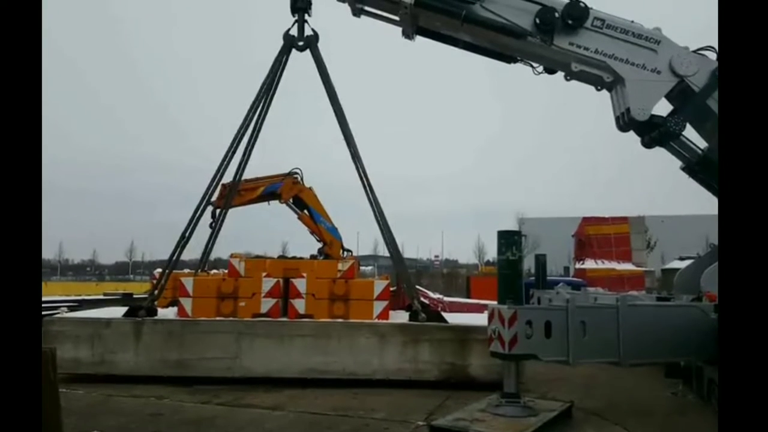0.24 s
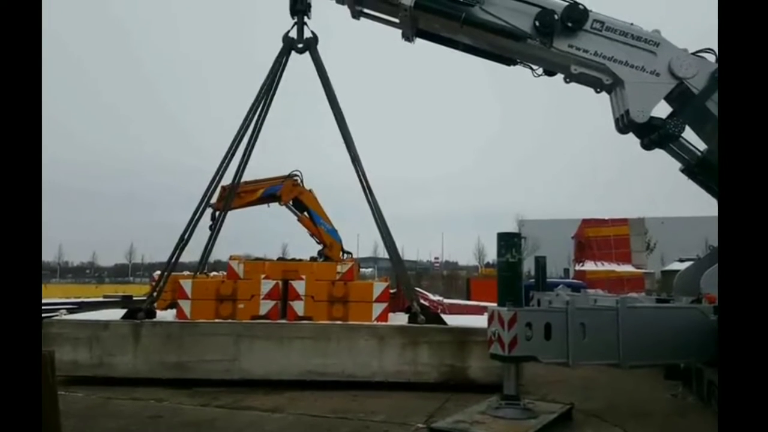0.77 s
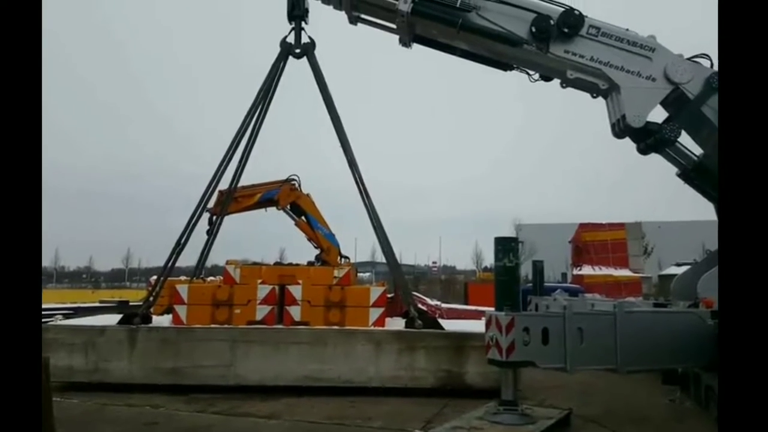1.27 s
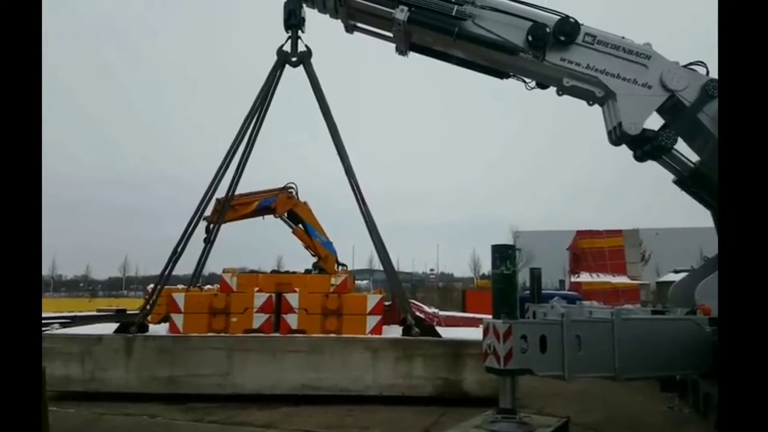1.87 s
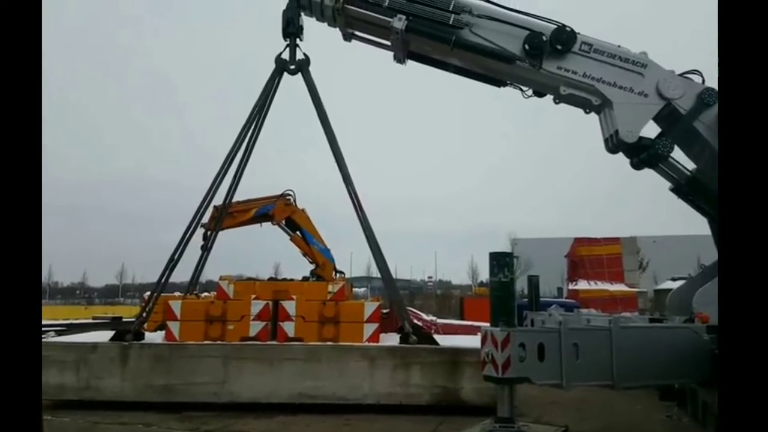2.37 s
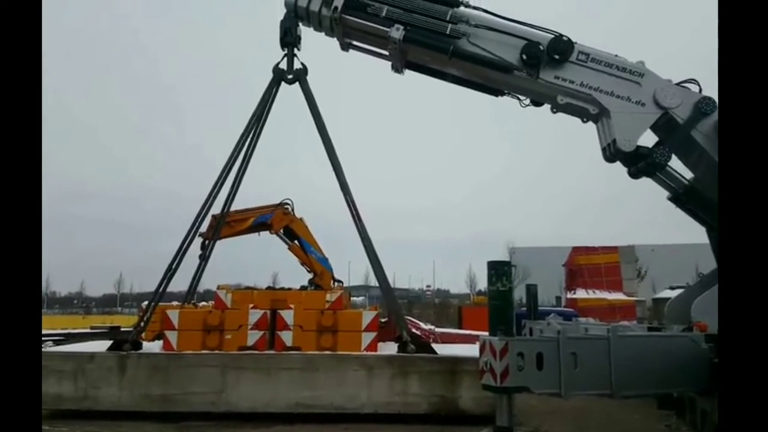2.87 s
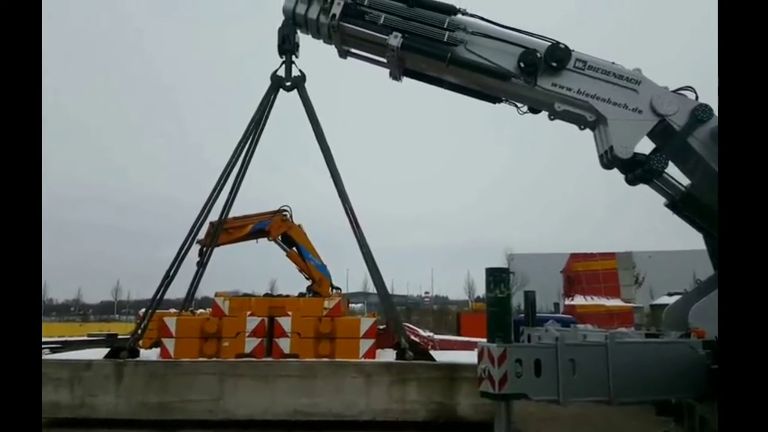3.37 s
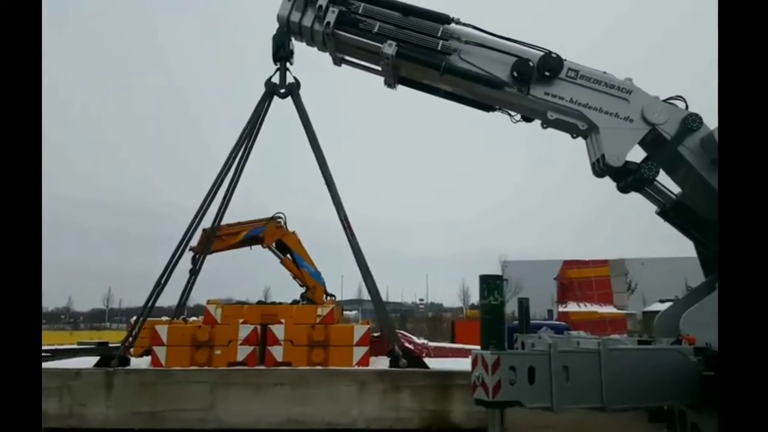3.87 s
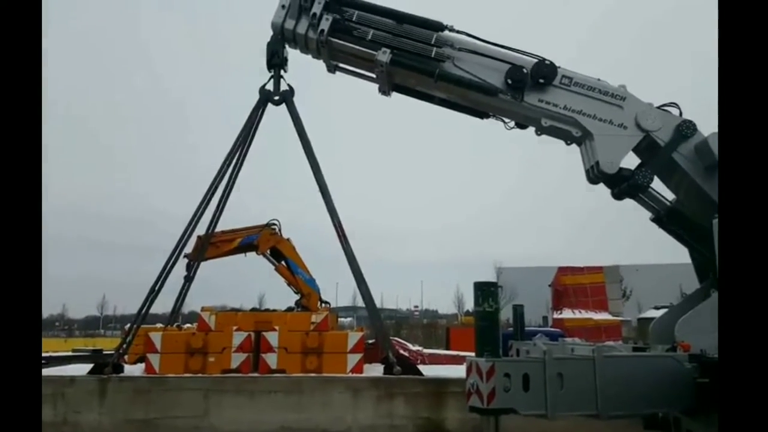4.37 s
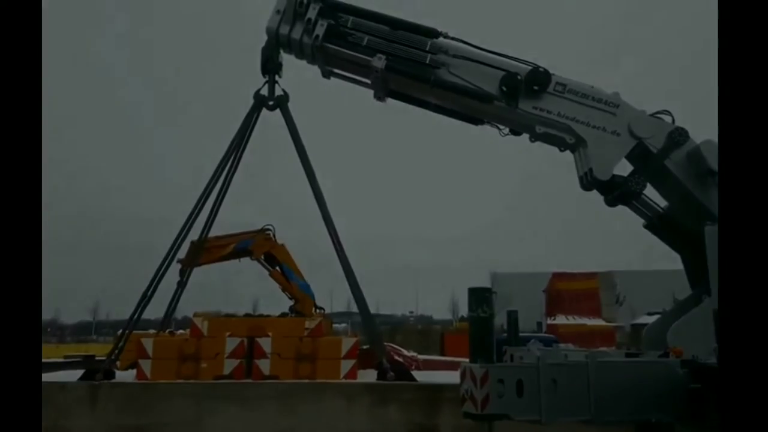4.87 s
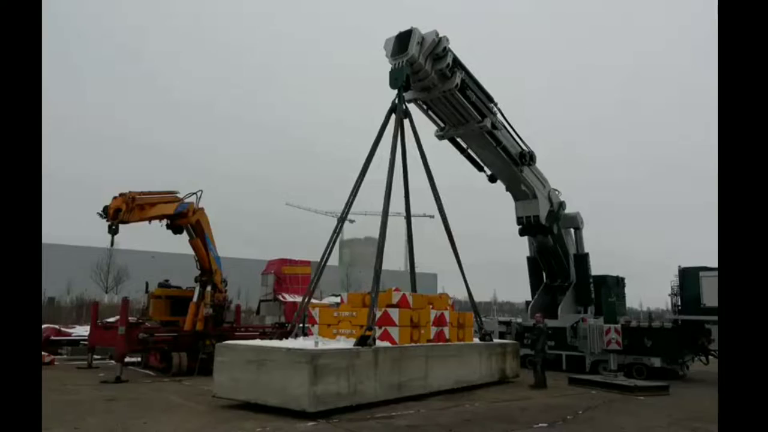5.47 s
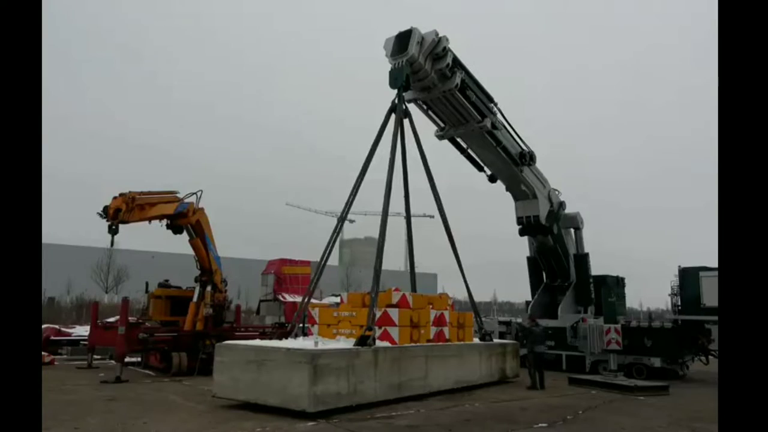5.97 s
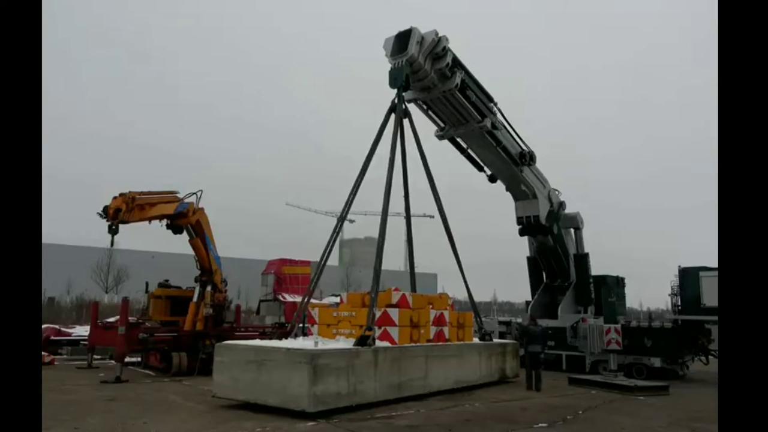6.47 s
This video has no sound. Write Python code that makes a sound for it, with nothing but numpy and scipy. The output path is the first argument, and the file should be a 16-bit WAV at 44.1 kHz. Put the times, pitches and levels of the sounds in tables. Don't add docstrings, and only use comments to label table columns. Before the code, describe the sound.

Loud steady diesel and hydraulic pump whine of a crane up close drops suddenly, fades to silence, then clicks to a distant hum with a piercing valve whistle.

```python
import sys
import numpy as np
from scipy import signal
from scipy.fft import rfft, irfft
from scipy.io import wavfile
from scipy.ndimage import uniform_filter1d

SR = 44100
rng = np.random.default_rng(int(sys.argv[2]) if len(sys.argv) > 2 else 0)


def dump(signal):
    limited = np.clip(np.atleast_2d(signal).T, -1, 1)
    pcm = np.round(limited * 32767).astype(np.int16)
    wavfile.write(sys.argv[1], SR, pcm)


def invert_db(level):
    return 10 ** (np.asarray(level, dtype=float) / 20)


N = 296793
T = np.arange(N) / SR
COARSE = T[::64]
FREQ = np.fft.rfftfreq(N, 1 / SR)

SHAFT_HZ, PUMP_ORDER, MESH_ORDER = 25.997, 14, 78
ROAR_TOP_HZ, NEAR_ROAR_DB, FAR_ROAR_DB, LEFT_ROAR_DB = 15480, -26, -37, -1.2
DUCK_S, SILENT_S, CHANGE_S = 4.118, 5.63, 5.6383

# shaft order, level in
# dB, left minus right in dB, left phase lead in rad.
SHAFT_ORDERS = [(1.5, -59, -3, -0.3), (3.0, -30, -1, -0.1), (4.5, -42, -1, -0.3), (6.0, -34, -1, -0.1),
                (6.5, -41, -1, -0.2), (7.0, -38, -1, -0.2), (7.5, -40, -1, -0.3), (9.0, -48, -2, -0.1),
                (10.0, -40, -2, -0.0), (12.0, -44, 8, -0.1), (14.0, -25, -8, -0.7), (15.0, -49, -3, -0.7),
                (17.0, -51, -3, -0.4), (18.0, -50, -5, -0.6), (19.5, -52, 2, -0.7), (20.0, -47, 1, -1.3),
                (20.5, -45, -1, -1.3), (21.0, -44, -6, -0.4), (21.5, -53, -2, -0.6), (22.0, -45, -3, -0.9),
                (22.5, -47, -1, -0.6), (23.5, -49, -1, -0.6), (26.0, -51, -1, -1.1),
                (28.0, -38, -2, -0.6), (29.0, -46, 1, -1.1), (30.0, -51, -10, -1.7), (35.0, -49, -1, -1.4),
               (36.0, -47, 0, -1.9), (38.0, -48, 2, -1.7), (39.0, -33, 0, -1.9), (40.0, -49, 0, -2.7),
               (41.0, -46, -1, -1.9), (42.0, -48, -1, -1.1), (44.0, -33, -2, -2.7), (45.0, -49, -5, -2.4),
               (46.0, -51, 0, -2.5), (49.0, -49, -1, 3.1), (50.0, -48, 1, -2.9), (56.0, -43, -1, 2.7),
               (70.0, -48, 3, -2.4), (75.0, -48, -9, -0.2), (78.0, -38, 3, 1.0), (78.5, -44, -5, 0.9),
               (84.0, -50, -8, 0.8), (87.0, -49, -8, -0.4), (88.0, -42, -5, -1.0), (116.0, -45, -10, 2.9),
               (117.0, -33, -6, 2.4), (132.0, -50, -4, 2.0), (156.0, -46, -17, 2.5), (195.0, -60, 1, 2.7)]
# frequency in Hz, level in dB, left minus right in dB,
# left phase lead in rad.
BELT_TONES = [(53.4, -41, -1, -0.0), (107.0, -47, -3, -0.1), (213.4, -44, 2, -0.1), (267.2, -49, 1, -0.4),
              (326.9, -46, 2, -0.6), (374.5, -50, -2, -0.7), (381.5, -49, -1, -0.2), (453.4, -46, -8, -0.7),
              (710.0, -44, 0, -0.9), (1334.7, -50, 6, 2.9), (1525.2, -39, 1, 2.6), (1774.9, -48, -1, 2.9),
              (2130.2, -48, -8, -0.8), (3195.4, -48, -3, 2.4), (3274.3, -55, -2, 1.7),
              (3549.9, -51, -2, 2.8), (3701.5, -57, 2, 0.0), (3905.1, -53, -1, 2.7), (4615.7, -61, 6, -0.2),
              (5325.7, -55, 4, -2.6), (6036.1, -64, -6, 0.8), (6389.0, -65, 2, -2.9), (6744.0, -61, 5, 1.9),
              (7098.4, -63, 7, 0.8), (7456.2, -63, -9, 1.3), (7533.1, -65, -8, -0.1),
              (7808.6, -61, -12, 0.0), (8109.3, -63, -8, 1.7)]
PAIR_CREEP = {78: ((0, -1), (.6, 2.2)), 88: ((-7, -2), (-.9, -.4)), 117: ((-5.5, -6.5), (2.1, 3.2)),
              156: ((-9, -5), (.4, 1.8))}
# swing in dB, for left, then right.
PUMP_SWELL_DB = np.array([[2.4], [1.1]])
# frequency in Hz, close level in dB,
# distant level in dB.
FAN_BEAT = (160.3, -39, -43)
# frequency in Hz, density in dB per Hz.
NEAR_ROAR = [(30, -25), (75, -14.5), (180, -6.5), (420, -13.5), (650, -14.5), (850, -16), (1270, -13.5),
             (2000, -15.5), (3100, -19), (4600, -23.5), (5700, -30.5), (9500, -35), (10200, -38.5),
             (15400, -41)]
# frequency in Hz, width in Hz, left gain in dB,
# right gain in dB.
BAY_MODES = [(183, 96, -1, 0), (553, 68, 3.5, 3.5), (1028, 50, 5.5, -0.5), (1503, 320, 4, 4.5),
             (1916, 250, 4.5, 3.5), (2437, 270, -0.5, 6), (2940, 126, 3.5, 6.5), (4240, 346, 1.5, 3),
             (8160, 2300, 3.5, 5), (12900, 2600, 8.5, 6.5)]
# frequency in Hz, likeness from 0 to 1.
COHERENCE = [(45, .9), (75, .995), (300, .92), (700, .86), (1500, .78), (2400, .4), (4300, .5), (5600, .15),
             (15000, .15)]
# frequency in Hz, lead in rad.
LEFT_LEAD = [(0, 0), (250, -.2), (780, -1.2), (1400, -3.1), (1800, -3.8), (2600, -9.4), (4000, -12.6),
             (5300, -15), (6200, -17.6)]
# frequency in Hz, density in dB per Hz.
FAR_ROAR = [(30, -23), (156, -14), (300, -20), (850, -23), (1150, -22.5), (2000, -24), (3500, -30.5),
            (5000, -35.5), (7400, -41), (9300, -47.5), (10300, -59), (13000, -56), (15400, -62)]
# frequency in Hz, level in dB.
FAR_TONES = [(53.3, -50.3), (78.0, -42.8), (156.3, -44.5), (194.9, -51.5), (259.9, -48.8), (363.9, -27.1),
             (453.4, -53.4), (545.8, -51.2), (727.9, -53.9), (961.5, -55.3), (1013.7, -51.4),
             (1065.7, -57.7), (1143.6, -45.3), (1951.4, -59.1), (2027.3, -49.3), (2129.5, -55.0),
             (2287.3, -55.8), (3040.7, -49.4), (3430.6, -63.3), (4054.3, -60.9), (4258.8, -61.6),
             (5067.6, -65.4)]
# time in seconds, pitch in Hz, level in dB.
WHISTLE = [
    (5.66, 1790, -31.5),
    (5.9, 1789.5, -27.5),
    (6.07, 1792, -26.5),
    (6.2, 1792, -31),
    (6.3, 1790.5, -28.5),
    (6.4, 1790.5, -34.5),
    (6.53, 1789.5, -32),
    (6.72, 1790.5, -33.5),
]
# partial number, first level in dB, last level in dB.
OVERTONES = [(2, -47.5, -56), (3, -57.5, -53.5), (4, -52, -53), (5, -57, -69), (6, -72, -75), (7, -70, -77),
             (8, -83, -81)]
# time in seconds, partial number, change in dB,
# half-width in seconds.
BOOM_ECHOES = [(5.983, 1, -18, 0.018), (6.22, 1, -3, .02), (5.83, 2, 3, .1), (6.4, 2, -7, .08),
               (5.93, 4, -11, .05), (6.03, 4, 7, .04), (6.4, 4, -3, .05), (6.35, 3, 3.5, .2),
               (5.96, 5, -5, .03), (6.32, 5, 3, .04), (5.97, 6, -8, .015), (5.97, 7, 4, .04),
               (5.98, 8, 7, .05)]


def level(x, db):
    return x * invert_db(db) / np.sqrt(np.mean(x ** 2))


def fine(x):
    return np.interp(T, COARSE, x)


def walk(rate):
    hold, n = int(SR / 64 / rate), len(COARSE)
    steps = np.repeat(rng.standard_normal(n // hold + 1), hold)
    slewed = uniform_filter1d(uniform_filter1d(steps, hold), hold)
    return 1.208 * slewed[:n]


def on_log(hz, table):
    points = np.array(table)
    return np.interp(np.log(hz + 1), np.log(points[:, 0]), points[:, 1])


def shaft_time():
    turn = 2 * np.pi * SHAFT_HZ * T
    twist_s = 1.2e-5 * np.sin(turn) + .8e-5 * np.sin(turn / 2 + 1) + 1e-5 * np.sin(2 * turn + 2)
    speed_error = fine(.00015 * walk(2.5) + .0006 * walk(40))
    return T + twist_s + np.cumsum(speed_error) / SR


def clatter(clock, share, knock_db):
    turn = 2 * np.pi * SHAFT_HZ * clock
    knocks_db = knock_db * (np.cos(turn) + .5 * np.cos(3 * turn) + 0.37 * np.cos(turn / 2))
    knocks_db = knocks_db + 0.68 * fine(walk(14))
    echo = .8 / (1 + (FREQ / 7000) ** 2) * np.exp(-4j * np.pi * FREQ / SHAFT_HZ)
    comb_power = (1 - abs(echo) ** 2) / abs(1 - echo) ** 2
    memory = np.sqrt(1 - share + share * comb_power)
    noise = irfft(rfft(rng.standard_normal(N)) * memory, N)
    return rfft(noise * invert_db(knocks_db))


def near_roar(clock):
    alike = on_log(FREQ, COHERENCE)
    right = clatter(clock, .5, .45)
    left = alike * right + np.sqrt(1 - alike ** 2) * clatter(clock, .5, .45)
    left = left * np.exp(1j * np.interp(FREQ, *np.transpose(LEFT_LEAD))) * invert_db(LEFT_ROAR_DB)
    bay_db = 0
    for hz, width_hz, left_db, right_db in BAY_MODES:
        resonance = 1 / (1 + (2 * (FREQ - hz) / width_hz) ** 2)
        bay_db = bay_db + np.outer([left_db, right_db], resonance)
    colour = invert_db(on_log(FREQ, NEAR_ROAR) + bay_db) * (FREQ < ROAR_TOP_HZ)
    return level(irfft(np.array([left, right]) * colour, N), NEAR_ROAR_DB)


def tone(clock, hz, db, lead=0.):
    high = min(hz / 2500, 1)
    waver_db = (.4 + .2 * high) * walk(5) + 1.4 * high * walk(60) + .4 * walk(14)
    waver_db = waver_db + np.clip(hz / 500 - 5.4, -.5, 1.4)
    cycle = 2 * np.pi * (SHAFT_HZ * COARSE + rng.random((2, 1)))
    waver_db = waver_db + high * (3.4 * np.sin(cycle[0]) + .8 * np.sin(cycle[1] / 2))
    phase = 2 * np.pi * (hz * clock + rng.random())
    return np.sqrt(2) * fine(invert_db(db + waver_db)) * np.sin(phase + lead)


def pair(clock, hz, db, pan_db, lead):
    share = invert_db(np.array([pan_db, -pan_db]).reshape(2, -1) / 2)
    share = share / np.sqrt(np.mean(share ** 2, axis=0))
    tremble_s = 1e-6 * (3 * walk(4) + 13 * walk(55))
    lead = lead + fine(2 * np.pi * hz * tremble_s)
    return tone(clock, hz, db, np.array([lead, 0 * lead])) * share


def near_tones(clock):
    pump_cycle_s, pump_loudest_s = 2.05, 1.53
    load = np.cos(2 * np.pi * (T - pump_loudest_s) / pump_cycle_s)
    swell = {PUMP_ORDER: invert_db(np.array(PUMP_SWELL_DB) * load),
             MESH_ORDER: invert_db(1.2 - 0.6 * T)}
    out = tone(clock, *FAN_BEAT[:2])
    for order, db, *place in SHAFT_ORDERS:
        if order in PAIR_CREEP:
            place = [np.interp(T, [0, SILENT_S], ends) for ends in PAIR_CREEP[order]]
        out = out + pair(clock, order * SHAFT_HZ, db, *place) * swell.get(order, 1)
    return out + sum(pair(clock, *row) for row in BELT_TONES)


def change_click():
    return -invert_db(-22) * np.exp(-((T - CHANGE_S) / .000022) ** 2)


def far_machine(clock):
    colour = invert_db(on_log(FREQ, FAR_ROAR)) * (FREQ < ROAR_TOP_HZ)
    roar = irfft(clatter(clock, 0.35, 0.43) * colour, N)
    tones = sum(tone(clock, hz, db) for hz, db in [*FAR_TONES, FAN_BEAT[::2]])
    return level(roar, FAR_ROAR_DB) + tones


def valve_whistle():
    s, *columns = np.transpose(WHISTLE)
    hz, first_db = (np.interp(T, s, column) for column in columns)
    phase = 2 * np.pi * np.cumsum(hz + .3 * fine(walk(40))) / SR
    partial_db = {1: first_db}
    for k, start_db, end_db in OVERTONES:
        partial_db[round(k)] = np.interp(T, s[[0, -1]], [start_db, end_db]) + 1.2 * fine(walk(12))
    for at_s, k, change_db, width_s in BOOM_ECHOES:
        partial_db[round(k)] = partial_db[round(k)] + change_db / (1 + ((T - at_s) / width_s) ** 2)
    return np.sqrt(2) * sum(invert_db(db) * np.sin(k * phase) for k, db in partial_db.items())


def scene():
    clock = shaft_time()
    near = near_roar(clock) + near_tones(clock)
    fade = invert_db(-7.0) * np.clip((SILENT_S - T) / (SILENT_S - DUCK_S), 0, 1)
    ducked = np.clip((T - DUCK_S) / 0.0059 + .5, 0, 1)
    near_gain = ((1 - ducked) + ducked * fade) * (T < CHANGE_S - .016)
    far = far_machine(clock) + valve_whistle()
    far_gain = np.clip((T - CHANGE_S) / .0005, 0, 1)
    return near * near_gain + far * far_gain + change_click()


def low_pass(x):
    return signal.sosfilt(signal.butter(12, 16440, fs=SR, output="sos"), x)


def record(dry):
    return low_pass(dry)


dry = scene()
out = record(dry)
dump(out)
```